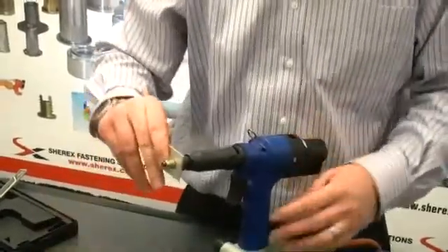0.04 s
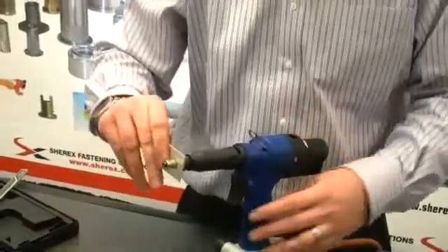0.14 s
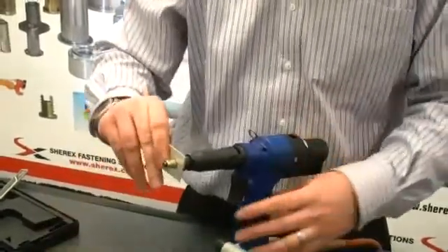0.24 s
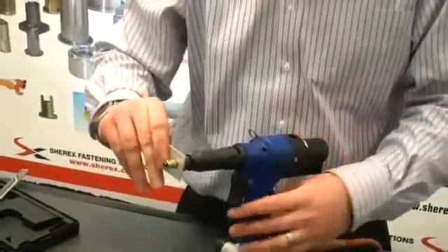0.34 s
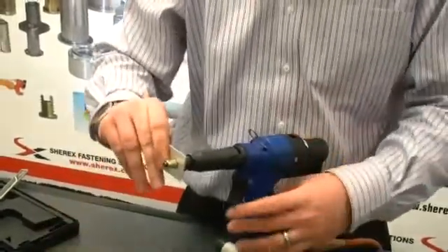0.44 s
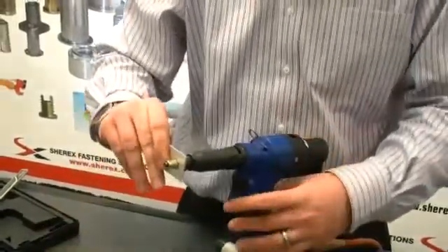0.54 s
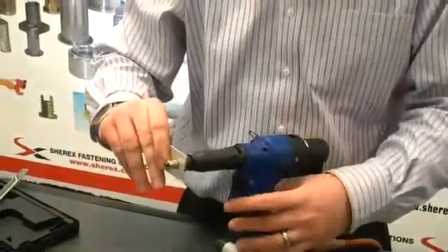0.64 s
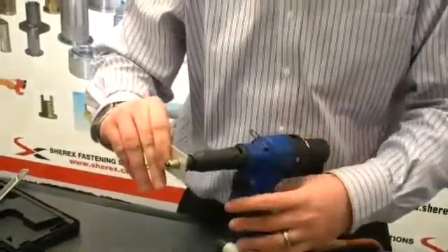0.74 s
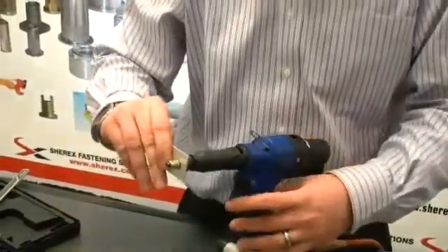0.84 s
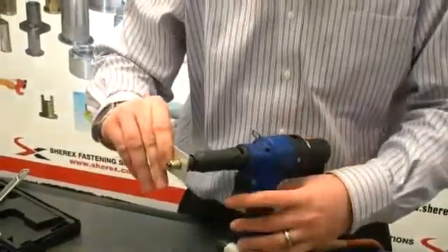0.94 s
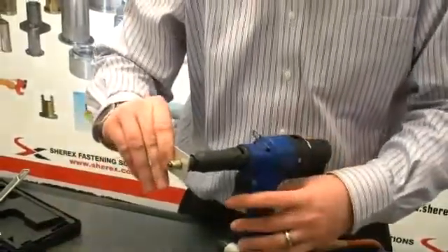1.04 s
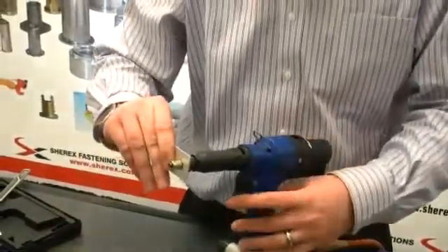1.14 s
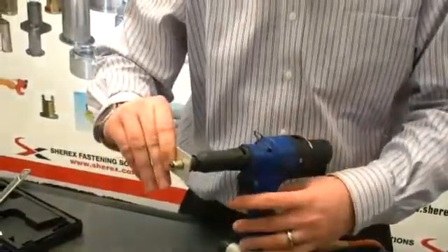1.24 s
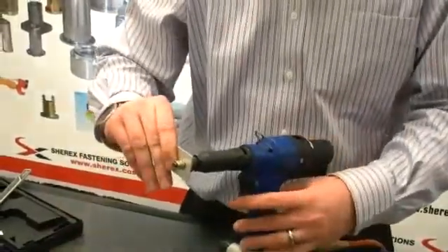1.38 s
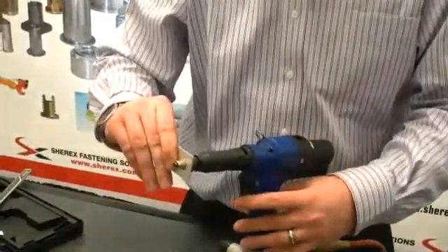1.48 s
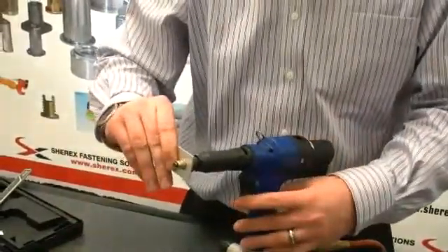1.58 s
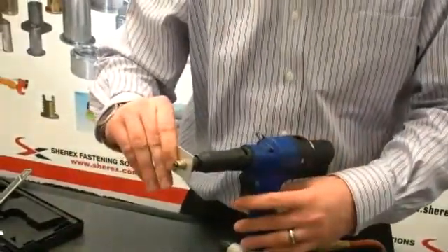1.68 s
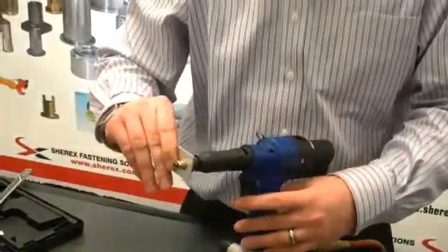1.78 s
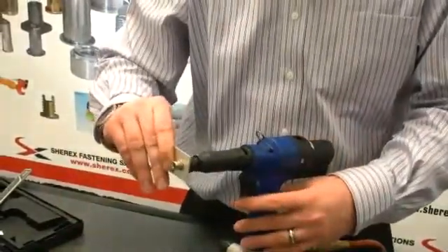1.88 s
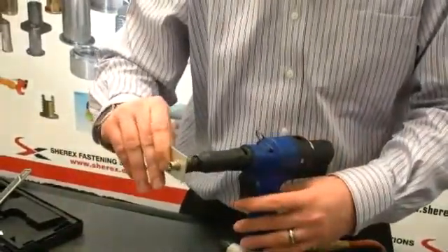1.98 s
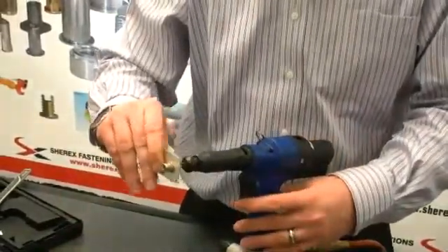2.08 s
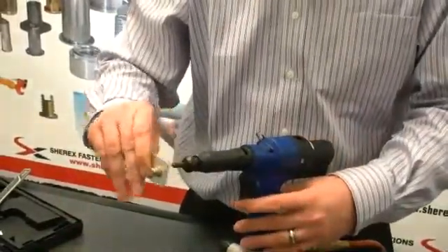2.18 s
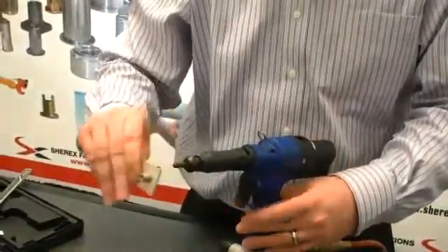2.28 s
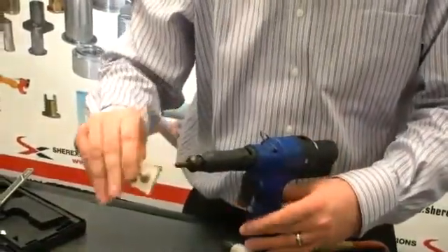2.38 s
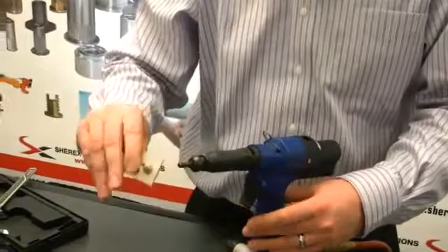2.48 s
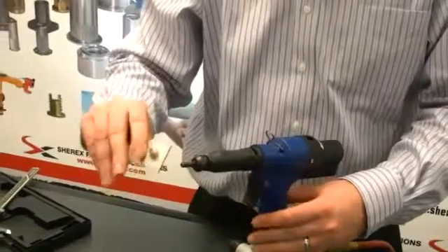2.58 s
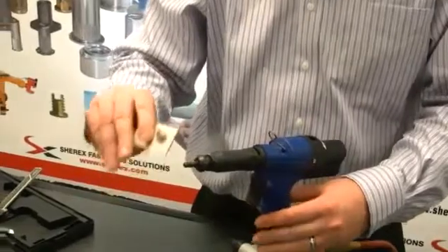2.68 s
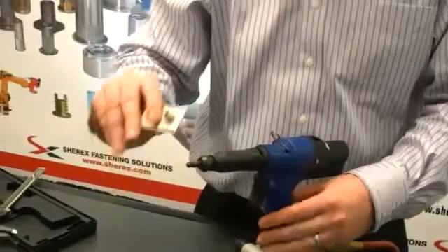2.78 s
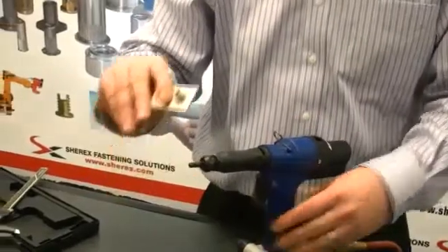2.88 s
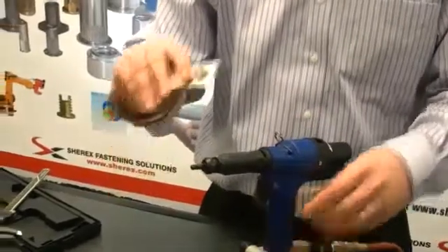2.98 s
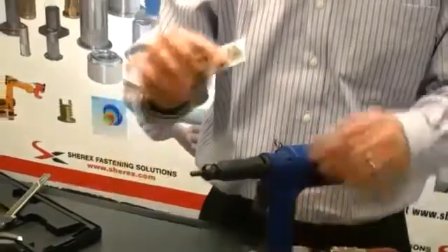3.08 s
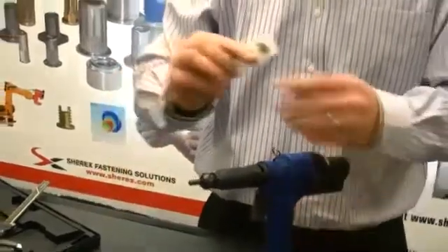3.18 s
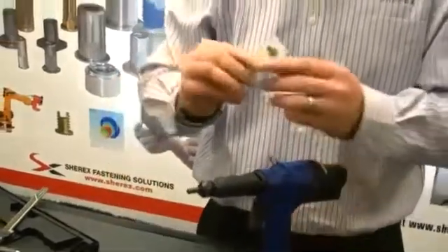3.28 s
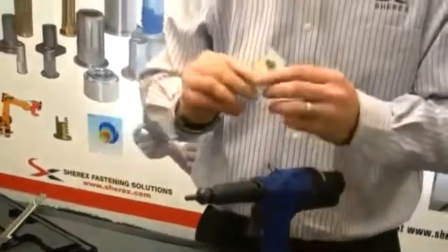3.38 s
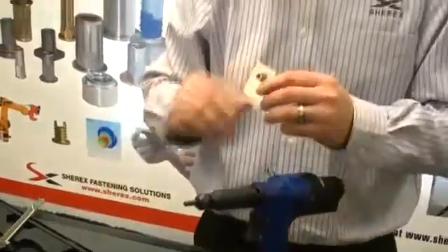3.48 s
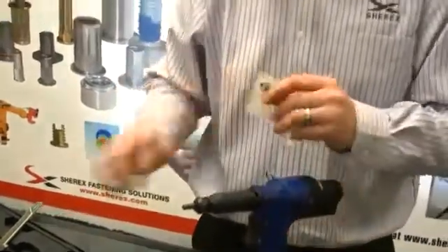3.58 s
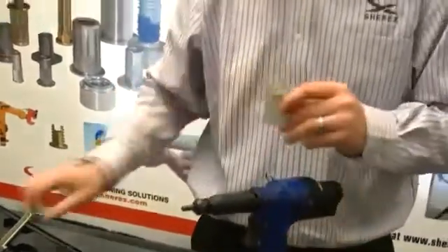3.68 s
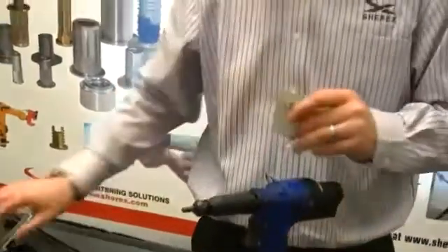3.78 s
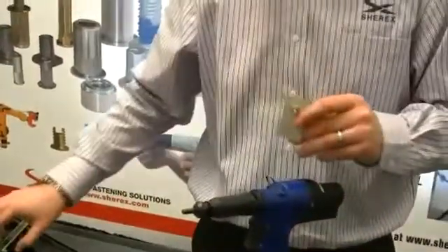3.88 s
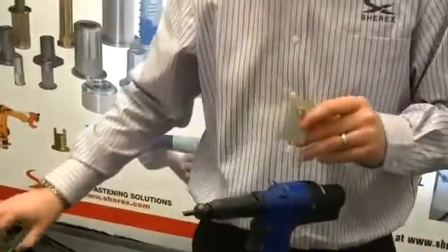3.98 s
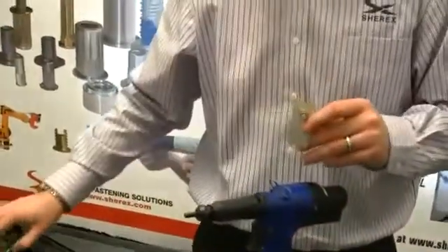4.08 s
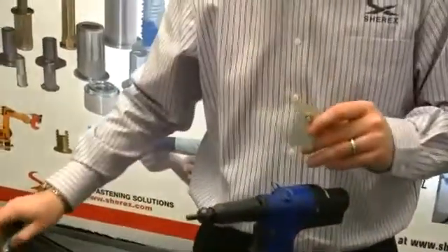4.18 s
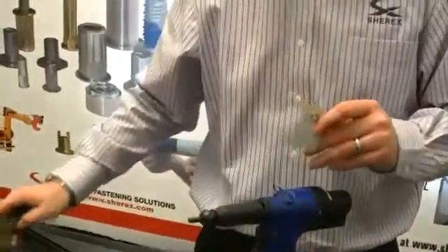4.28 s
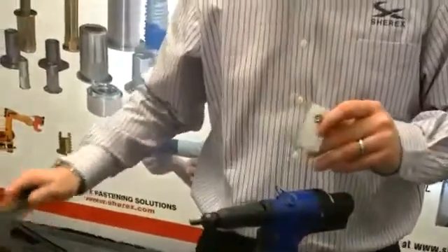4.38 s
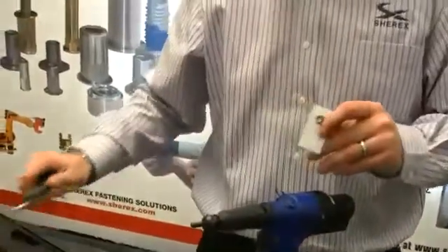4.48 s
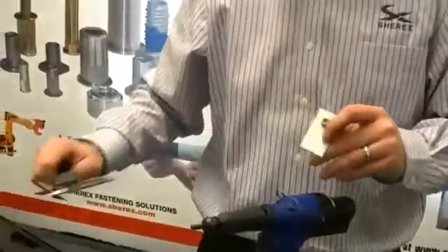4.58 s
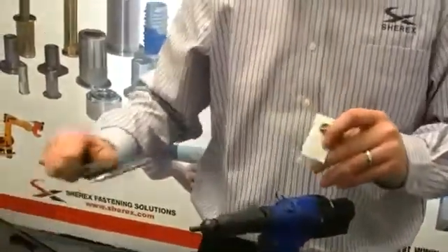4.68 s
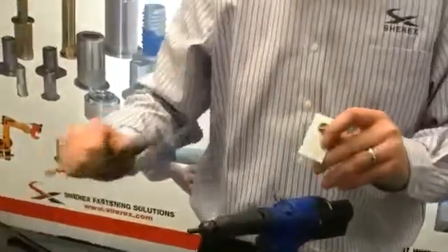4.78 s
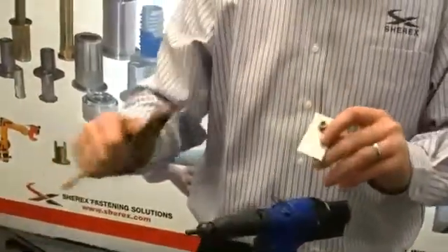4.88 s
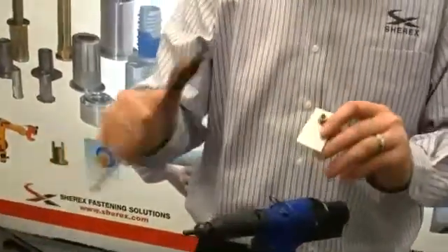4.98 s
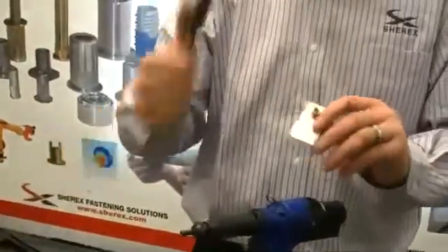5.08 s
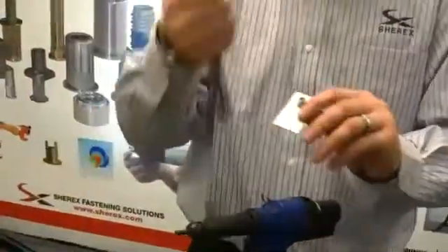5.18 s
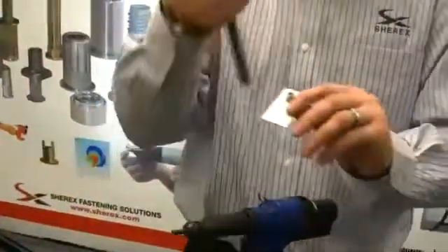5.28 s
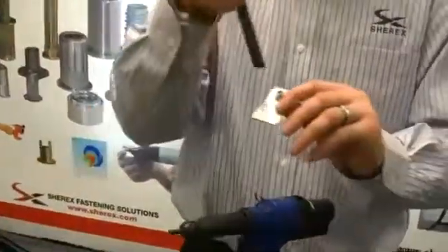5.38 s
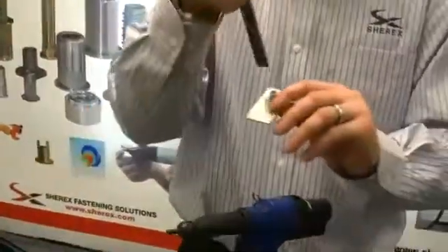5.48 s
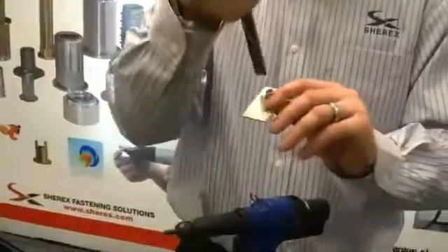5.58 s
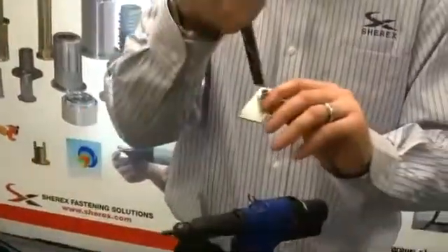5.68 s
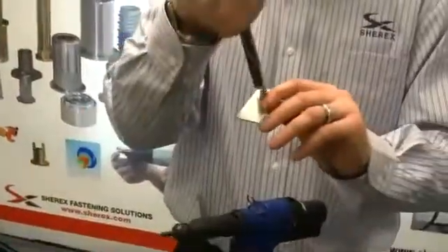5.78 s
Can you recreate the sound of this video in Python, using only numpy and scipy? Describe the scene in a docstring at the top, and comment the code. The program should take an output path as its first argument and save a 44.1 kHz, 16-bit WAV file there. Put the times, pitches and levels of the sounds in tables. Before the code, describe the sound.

Near stereo pickup, slightly right of centre, in a small room with a short soft tail. Sparse metal clicks lead to a pneumatic sequence: chirp and thump, bright hiss, louder exhaust blast, buzzy high motor whine, abrupt stop. After a quiet pause with barely audible handling, a metal tool clatters in a hollow plastic case, then soft sleeve rustling over steady room hum.

```python
"""Setting a rivet nut

In a quiet workshop an air-powered tool sets one rivet nut in a small steel plate, close by.
The nut ticks on the mandrel. Air, made from coloured noise, rushes into the piston and blows off hard.
Then the air motor whines, a stack of wobbling tones over chopped noise, as it spins the mandrel out.
Last, a steel gauge knocks and scrapes in its plastic case, which rings as a set of decaying tones.
Cloth rustles now and then, over a steady bed of ventilation and hum."""
import sys
import numpy as np
from scipy import signal
from scipy.fft import rfft, irfft
from scipy.io import wavfile
from scipy.ndimage import uniform_filter1d

SR = 44100
rng = np.random.default_rng(int(sys.argv[2]) if len(sys.argv) > 2 else 0)


def to_wav(s):
    """Save 16-bit WAV."""
    ch = np.atleast_2d(s).T  # columns
    pcm = np.round(np.clip(ch, -1, 1) * 32767)  # PCM
    wavfile.write(sys.argv[1], SR, pcm.astype(np.int16))


N = 257543
T = np.arange(N) / SR  # time of every sample, in seconds

# Moments at which the valves switch, in seconds
TRIGGER_S, RELIEF_S, SPIN_S, STOP_S, SHUT_S = 1.2805, 1.521, 1.858, 2.344, 2.577

# Air motor: the vane rate closes in on its free speed
START_HZ, FREE_HZ, RUN_UP_S = 480, 789, .019
# The freshly set thread holds the motor back until it comes loose
DRAG_HZ, DRAG_S, LOOSEN_S = 49, .053, .018
# The whine grows with speed and sags with the line pressure
WHINE_DB, WHINE_SPEED_POWER, WHINE_SAG_DB_PER_S = -12.3, 6, 5.5
# The exhaust gulps extra air while the rotor is still slow
EXHAUST_DB, GULP_DB, GULP_S = -21, 5, .02
# After the stop valve the motor runs on for a moment, then brakes and dies away
RUN_ON_S, BRAKE_HZ_PER_S, WHINE_RELEASE_S, EXHAUST_RELEASE_S = .004, 200, .013, .016

# The tones of the whine. Each row: multiple of the vane rate, relative level in dB,
# extra level while spinning up in dB, throb per mandrel turn in dB, random flutter in dB.
WHINE_TONES = [(1, -0.8, -1, .3, 1.2), (2, -2.8, -8, 3.5, 2.5), (3, 1, 1.5, 1.54, 1.5), (4, -16, 3, 2, 3),
               (5, -8, 3, 0.5, 2), (6, -27, 0, 2, 3), (7, -21.5, -0.5, 2, 5), (8, -21, 0.5, 2.5, 3.5),
               (12, -17.5, -1.5, 2.5, 2.5)]
# Colour of the motor exhaust. Each row: frequency in Hz, relative level in dB.
EXHAUST_SPECTRUM = [(70, -18.5), (160, -5), (400, -14.5), (950, -7.5), (1700, -11.5), (2520, -5),
                    (2700, -1), (4000, -0.5), (4400, -11), (5150, -14), (5550, -1.5), (7200, -3.5),
                    (8400, 0.5), (9500, -3)]


def motor(jitter=.005, chop_depth=0.38, labour_db=2.8):
    """Vanes chop the exhaust like a siren; speed and strength wobble once per turn of the geared mandrel."""
    running, end = since(SPIN_S), STOP_S + RUN_ON_S
    spinning_up = gate(SPIN_S, SPIN_S + DRAG_S, fall=LOOSEN_S)

    run_up = (FREE_HZ - START_HZ) * np.exp(-(running / RUN_UP_S) ** 2)
    vane_hz = FREE_HZ - run_up - DRAG_HZ * spinning_up
    vane_hz = np.maximum(vane_hz - BRAKE_HZ_PER_S * since(STOP_S), 0)
    # the mandrel makes about 34 turns a second
    turn = 2 * np.pi * np.cumsum(34 * (1 + .05 * walk(15))) / SR
    speed = vane_hz * (1 + .011 * np.sin(turn))
    phase = 2 * np.pi * np.cumsum(speed * (1 + jitter * walk(400))) / SR

    whine = 0
    for multiple, db, start_db, throb_db, flutter_db in WHINE_TONES:
        wobble_db = flutter_db * walk(45) - throb_db * np.sin(turn)
        strength = undb(db + start_db * spinning_up + wobble_db)
        # the muffler smears each puff, so the overtones do not peak together
        whine = whine + strength * np.cos(multiple * phase + multiple ** 2 * np.pi / 2)
    whine = whine / np.std(whine[(T > SPIN_S) & (T < STOP_S)])
    drive_db = WHINE_DB + labour_db * spinning_up - WHINE_SAG_DB_PER_S * running
    drive = (vane_hz / FREE_HZ) ** WHINE_SPEED_POWER * undb(drive_db)
    whine = whine * drive * gate(SPIN_S, end, fall=WHINE_RELEASE_S)

    flow_db = EXHAUST_DB + GULP_DB * np.exp(-running / GULP_S)
    flow = gate(SPIN_S, end, fall=EXHAUST_RELEASE_S) * undb(flow_db)
    chop = 1 + chop_depth * np.cos(phase) * gate(SPIN_S, end)
    return whine + jet(flow, EXHAUST_SPECTRUM, flicker_db=0.7, chop=chop)


# The relief valve opens gradually, then sags with the line pressure
RELIEF_DB, RELIEF_OPEN_S, RELIEF_SAG_DB_PER_S = -16.7, .014, 8.5
# Once the motor stops, the line bleeds away
BLEED_DB, BLEED_SAG_DB_PER_S = -37, 42

# Colour of the air blown off. Each row: frequency in Hz, relative level in dB.
RELIEF_SPECTRUM = [(100, -24), (350, -25.5), (750, -19), (980, -6), (1200, -3), (1500, -11), (2300, -1.5),
                   (2900, 0), (3700, -2.5), (4900, -8), (6200, 1.5), (7200, -3.5), (8400, 1), (9500, -1)]


def relief_and_bleed():
    """Pressure drives air out of the relief path: a full blast, and later a fast-fading bleed."""
    opening = gate(RELIEF_S, SPIN_S) * (1 - np.exp(-since(RELIEF_S) / RELIEF_OPEN_S))
    relief_flow = opening * undb(RELIEF_DB - RELIEF_SAG_DB_PER_S * since(RELIEF_S))
    bleed_flow = gate(STOP_S, SHUT_S) * undb(BLEED_DB - BLEED_SAG_DB_PER_S * since(STOP_S))
    return jet(relief_flow, RELIEF_SPECTRUM) + jet(bleed_flow, RELIEF_SPECTRUM)


FILL_DB = -31  # steady flow into the piston

# Colour of the air filling the piston. Each row: frequency in Hz, relative level in dB.
FILL_SPECTRUM = [(80, -16.5), (200, -5.5), (500, -21), (1200, -17.5), (1800, -20), (2300, -9.5), (3700, -5),
                 (4700, -7.5), (5300, -6), (5900, -3.5), (6550, 0.5), (7300, -7), (8500, -9), (10000, -9.5)]
# Extra flow as the nut gives way. Each row: time of the peak in seconds, level in dB, half width in seconds.
NUT_YIELDS = [(1.404, -25.6, .033), (1.494, -31, .01)]


def piston_fill():
    """Air rushes into the piston in a steady flow that swells as the nut gives way."""
    flow = gate(TRIGGER_S, RELIEF_S) * np.hypot(undb(FILL_DB), swells(NUT_YIELDS))
    return jet(flow, FILL_SPECTRUM, flicker_db=1.2)


WHISTLE_HZ, WHISTLE_DB = 6545, -41

# Chirp as the inlet valve lifts. Each row: time of the peak in seconds, level in dB, half width in seconds.
INLET_CHIRP = [(1.295, -21.5, .005)]


def inlet_whistle():
    """The inlet valve whistles faintly, with an unsteady pitch, all the while the piston fills."""
    pitch = WHISTLE_HZ + 45 * walk(200) - 30 * fade(TRIGGER_S, 0.17)
    tone = np.sqrt(2) * np.sin(2 * np.pi * np.cumsum(pitch) / SR) * undb(2.0 * walk(120))
    return tone * gate(TRIGGER_S, RELIEF_S) * np.hypot(undb(WHISTLE_DB), swells(INLET_CHIRP))


# Kicks of valves, piston and rotor. Each row: start in seconds, thump level in dB, thump pitch in Hz,
# time for the thump to drop 60 dB in seconds, air crack level in dB, time for the crack to drop 60 dB
# in seconds. Both levels are set before the bass cut.
VALVE_KICKS = [(TRIGGER_S, -18, 220, .055, -19.5, .022), (1.288, -21, 171, .3, -30, .04),
               (1.493, -30.5, 199, .15, -45, .02), (RELIEF_S, -17, 205, .055, -17, .028),
               (SPIN_S, -8, 290, .048, -20, .1), (1.8665, -14, 480, .065, -11.5, .07),
               (STOP_S, -19, 245, .069, -10, .05), (SHUT_S, -41, 300, .05, -34, .027)]
# Colour of the air cracks. Each row: frequency in Hz, relative level in dB.
CRACK_SPECTRUM = [(100, -9.5), (500, -2.5), (1100, 5.5), (2300, -8), (4500, -7.5), (7000, -5), (10000, -10)]


def valves(rumble_share=.4, low_cut_hz=115):
    """Each switch of pressure and each jolt of piston or rotor gives a low thump and a crack of air."""
    crack = noise(CRACK_SPECTRUM)
    rumble = noise([(30, -14), (150, 2), (340, -0.5), (520, -7.5), (1200, -24), (5000, -62)])
    thumps, cracks = 0, 0
    for start, thump_db, hz, thump_t60, crack_db, crack_t60 in VALVE_KICKS:
        thump = 0.83 * np.sin(2 * np.pi * hz * (T - start)) + rumble_share * rumble
        thumps = thumps + undb(thump_db) * thump * fade(start, thump_t60)
        cracks = cracks + undb(crack_db) * crack * fade(start, crack_t60)
    # so small a tool radiates little deep bass
    bass_cut = signal.butter(2, low_cut_hz, "high", fs=SR, output="sos")
    return signal.sosfilt(bass_cut, thumps + cracks)


# Light metal ticks of nut and plate. Each row: start in seconds, rough peak level in dB, ring pitch in Hz,
# time to drop 60 dB in seconds.
METAL_TICKS = [(.349, -36.5, 2950, .025), (.5074, -25.5, 2400, .016), (.527, -42, 1800, .02),
               (.608, -30.5, 2940, .02), (.8242, -30.5, 3560, .023), (2.953, -43.5, 1710, .081),
               (3.399, -47, 7000, .02), (4.876, -44, 5500, .015), (5.091, -46.5, 2020, .04),
               (5.4577, -45, 1195, .08)]
# Colour of the tick's crack. Each row: frequency in Hz, relative level in dB.
TICK_SPECTRUM = [(300, -21), (1200, -3), (2400, -10), (4000, -4), (5500, -16), (7500, -8), (10000, -13)]


def ticks(crack_share=0.52, ring_q=3.6):
    """Small hand-damped metal parts touch: a crack with one brief broad ring."""
    crack, out = noise(TICK_SPECTRUM), 0
    for start, db, hz, t60 in METAL_TICKS:
        ring = unit(resonate(rng.standard_normal(N), hz, ring_q))
        # noise peaks at about pi times its rms
        out = out + undb(db) * (ring + crack_share * crack) * fade(start, t60) / np.pi
    return out


# Every knock rebounds twice and leaves the gauge rattling (rattle in dB relative to the knock)
REBOUND_S, REBOUND_LOSS_DB, RATTLE_DB, RATTLE_T60_S = .0068, 10, -17, .27
# The gauge is dragged once across the case
SLIDE_S, SLIDE_DB, SLIDE_ATTACK_S, SLIDE_HOLD_S, SLIDE_RELEASE_S = 4.004, -36.6, .024, .042, .038

# Ringing modes of the case on the bench. Each row: pitch in Hz, relative level in dB,
# time to drop 60 dB in seconds.
CASE_MODES = [(188, -11.5, 0.14), (265, -3, 0.072), (465, -8, 0.11), (574, -3, 0.084), (733.6, 3.5, 0.071),
              (852, -7, 0.093), (1083, -13, 0.15), (1400, -1, 0.059), (1687, -6, 0.049), (1868, -6, 0.085),
              (2210, -14, .05), (2514, -20, .04), (2820, -26, 0.038), (3520, -20, 0.026),
              (4490, -14, 0.026), (6750, -19, 0.027)]
# Gauge knocking on the case. Each row: start in seconds, strength of the blow in dB,
# contact crack in dB relative to the blow, first rebound in dB relative to the knock.
GAUGE_KNOCKS = [(3.9062, -17.5, -4.5, 2), (4.007, -33, -10, -10), (4.109, -37, -6, -14),
                (4.1364, -21, -1, -5), (4.2093, -30.5, -8, -8), (4.2485, -27.5, -4, -16)]


def case(ring_db=-12.5, crack_t60=0.031, slip_rate=700, grit_share=0.7):
    """The gauge knocks, rattles and scrapes in its plastic case; blows and slips ring the same modes."""
    t = T[:SR // 3]
    body = 0
    for k, (hz, db, t60) in enumerate(CASE_MODES):
        body = body + undb(db) * (-1) ** k * np.sin(2 * np.pi * hz * t) * undb(-60 * t / t60)
    contact = noise([(150, -14), (700, 8), (1600, 6.5), (2400, .5), (4000, -5), (5200, -13.5),
                     (7300, -10.5), (10000, -13)])

    blows, cracks = np.zeros(N), 0
    slide = gate(SLIDE_S, SLIDE_S + SLIDE_HOLD_S, rise=SLIDE_ATTACK_S, fall=SLIDE_RELEASE_S)
    rubbing = undb(SLIDE_DB) * slide
    for start, db, crack_db, rebound_db in GAUGE_KNOCKS:
        first_db = db + rebound_db
        for k, blow_db in enumerate([db, first_db, first_db - REBOUND_LOSS_DB]):
            hit = start + k * REBOUND_S
            blows[int(hit * SR)] += undb(blow_db)
            cracks = cracks + undb(blow_db + crack_db) * .5 * contact * fade(hit, crack_t60)
        rubbing = np.hypot(rubbing, undb(db + RATTLE_DB) * fade(start, RATTLE_T60_S))

    # rubbing is a shower of tiny slips (about slip_rate a second) with gritty noise
    slips = rng.standard_normal(N) * (rng.random(N) < slip_rate / SR)
    slip_ring = unit(signal.fftconvolve(slips, body)[:N])
    scrape = unit(slip_ring + grit_share * contact * undb(2.5 * walk(150)))
    knock_ring = undb(ring_db) * signal.fftconvolve(blows, body)[:N]
    return knock_ring + cracks + scrape * rubbing


# Colour of rustling cloth. Each row: frequency in Hz, relative level in dB.
CLOTH_SPECTRUM = [(200, -9), (1000, 1), (2500, -3), (5000, -10.5), (10000, -9)]
# Arm movements that rustle the shirt sleeves. Each row: time of the peak in seconds, level in dB,
# half width in seconds.
SLEEVE_MOVES = [(.05, -68, .35), (1.17, -63.5, .035), (3.6, -66, .4), (4.55, -67, .4), (5.3, -61, .22)]


def sleeves():
    """Cloth brushes unevenly, swelling and fading with each move of an arm."""
    return noise(CLOTH_SPECTRUM) * swells(SLEEVE_MOVES) * undb(2.5 * walk(40))


# Nearby surfaces. Each row: echo delay in seconds, level in dB relative to the direct sound.
SURFACE_ECHOES = [(.0083, -19), (.0197, -17)]


def workshop(x, wet_db=-16.5, t60_low=0.58, t60_high=.46, scatter_db=-8.5, scatter_t60=.035, width=0.9):
    """Direct sound, treble scattered off hands and bench, two echoes and a soft tail; wider towards the top."""
    t = T[:int(.8 * SR)]
    low_pass = signal.butter(2, 2200, fs=SR, output="sos")
    high_pass = signal.butter(1, 3500, "high", fs=SR, output="sos")
    side_pass = signal.butter(1, 500, "high", fs=SR, output="sos")
    low_decay = undb(-60 * t / t60_low)
    mid, side = rng.standard_normal((2, len(t)))
    side = width * signal.sosfilt(side_pass, side)
    out = []
    for field in (mid + side, mid - side):
        tail = signal.sosfilt(low_pass, field) * low_decay + .45 * field * undb(-60 * t / t60_high)
        scatter = signal.sosfilt(high_pass, field) * undb(-60 * t / scatter_t60)
        response = tail * undb(wet_db) / np.linalg.norm(low_decay)
        response = response + scatter * undb(scatter_db) / np.linalg.norm(scatter)
        for delay, db in SURFACE_ECHOES:
            response[int(delay * SR)] += undb(db)
        out.append(x + signal.fftconvolve(x, response)[:N])
    return np.array(out)


VENT_DB = -52.5  # overall level of the ventilation

# Colour of the ventilation. Each row: frequency in Hz, relative level in dB.
VENT_SPECTRUM = [(15, -58.5), (25, -28), (70, -8), (91, -14), (123, -0.5), (146, -10.5), (242, -9),
                 (381, -17), (479, -17.5), (813, -24.5), (946, -28.5), (1280, -29.5), (1450, -32.5),
                 (1650, -32.5), (10400, -41.5), (13500, -69.5), (22000, -120)]
# Steady low hum. Each row: pitch in Hz, typical level in dB.
HUM_TONES = [(81, -65.5), (120, -58.5), (240, -66)]


def background():
    """Ventilation noise and humming tones in the middle, a faint wide hiss around them."""
    hum = 0
    for hz, db in HUM_TONES:
        hum = hum + np.sqrt(2) * undb(db + 2.6 * walk(5)) * np.sin(2 * np.pi * hz * T)
    vent = noise(VENT_SPECTRUM) * undb(VENT_DB + .8 * walk(8))
    wide = noise([(30, -5.5), (150, -5), (400, -4), (1200, -10.5), (10000, -27.5)]) * undb(-59.5)
    return hum + vent + np.array([wide, -wide])  # opposite signs left and right


# Cavities in the housing that colour the escaping air. Each row: pitch in Hz, sharpness Q (no unit),
# level in dB relative to the plain air noise.
HOUSING_CAVITIES = [(1040, 14, -8), (2850, 42, 1), (3750, 45, -3), (5580, 65, -5.5), (6510, 60, -8),
                    (8320, 60, -6), (9400, 50, -1)]


def jet(flow, colour, flicker_db=0, chop=1):
    """Turbulent air rings the housing and leaves by one path, as loud as its flow."""
    air = rng.standard_normal(N) * chop
    air = air + sum(undb(db) * resonate(air, hz, q) for hz, q, db in HOUSING_CAVITIES)
    return shape(air, colour) * flow * undb(flicker_db * walk(90))


def undb(db):
    """Decibels to gain."""
    return 10 ** (np.asarray(db) / 20)


def unit(x):
    """Scale to rms 1."""
    return x / np.sqrt(np.mean(x ** 2))


def since(start):
    """Seconds gone by since start, zero before it."""
    return np.maximum(T - start, 0)


def gate(start, end, rise=.002, fall=.006):
    """A valve that opens in a straight ramp at start and dies away exponentially after end."""
    return np.clip((T - start) / rise, 0, 1) * np.exp(-np.maximum(T - end, 0) / fall)


def fade(start, t60):
    """Exponential decay from a sudden start, dropping 60 dB in t60 seconds."""
    return (T >= start) * np.exp(-np.log(1000) * np.clip((T - start) / t60, 0, 10))


def swells(rows):
    """Bell-shaped rises and falls, summed in power."""
    power = 0
    for peak, db, width in rows:
        power = power + (undb(db) * np.exp(-.5 * ((T - peak) / width) ** 2)) ** 2
    return np.sqrt(power)


def walk(rate):
    """Smooth random wandering of rms 1, with about rate new values a second."""
    k = max(int(SR / rate), 1)
    steps = np.repeat(rng.standard_normal(N // k + 1), k)
    return unit(uniform_filter1d(steps, k)[:N])


def shape(x, colour):
    """Filter x by a (Hz, dB) curve and scale it to rms 1."""
    hz, db = np.transpose(colour)
    f = np.fft.rfftfreq(N, 1 / SR)
    gain = undb(np.interp(np.log(f + 1), np.log(hz), db))
    return unit(irfft(rfft(x) * gain, N))


def noise(colour):
    """Noise of rms 1 with a (Hz, dB) spectrum."""
    return shape(rng.standard_normal(N), colour)


def resonate(x, hz, q):
    """Band-pass with gain 1 at the centre."""
    return signal.lfilter(*signal.iirpeak(min(hz, SR / 3), max(q, 1), fs=SR), x)


def scene():
    """Tool, case and sleeves sound in the workshop; everything leans slightly to the right."""
    air = relief_and_bleed() + piston_fill() + inlet_whistle()
    near = motor() + air + valves() + ticks() + case() + sleeves()
    right_db = 0.8  # how much louder the right side is
    balance = undb(np.array([[-right_db], [right_db]]) / 2)
    return (workshop(near) + background()) * balance


CUT_HZ = 10300


def record(dry):
    """The very highest peaks are rounded and the top of the treble is cut steeply."""
    rounded = dry / (1 + (dry / .85) ** 6) ** (1 / 6)
    top_cut = signal.ellip(12, .1, 85, CUT_HZ, fs=SR, output="sos")
    return signal.sosfilt(top_cut, rounded)


dry = scene()
out = record(dry)
to_wav(out)
```